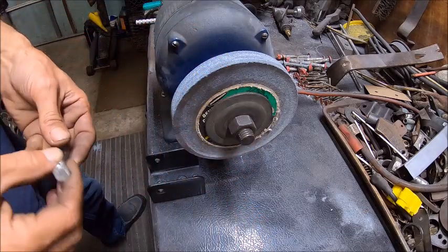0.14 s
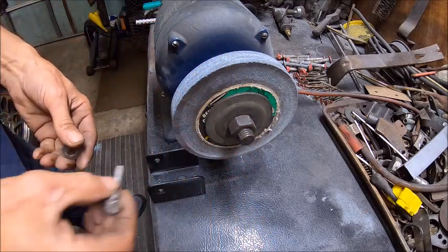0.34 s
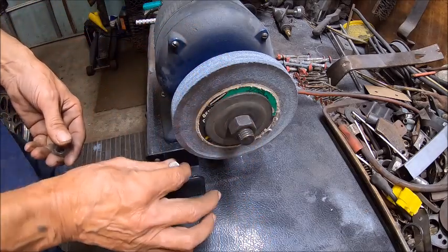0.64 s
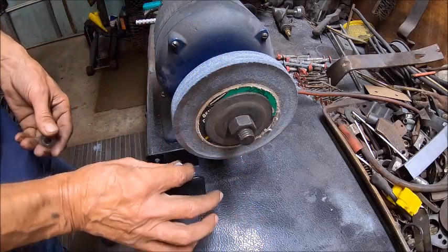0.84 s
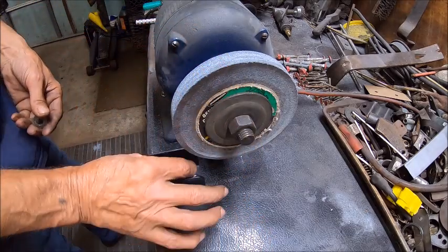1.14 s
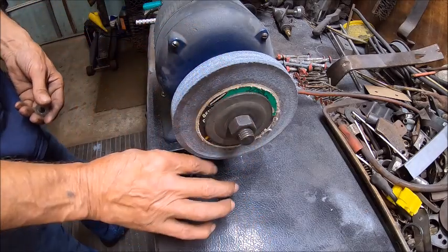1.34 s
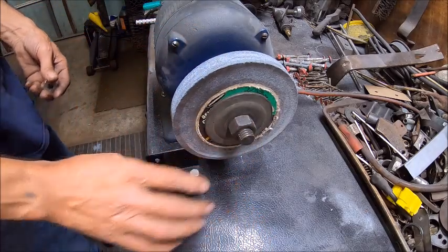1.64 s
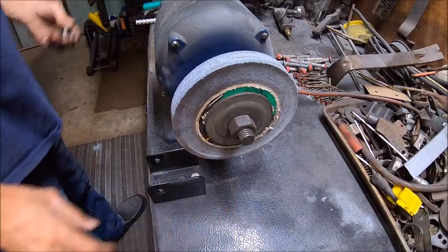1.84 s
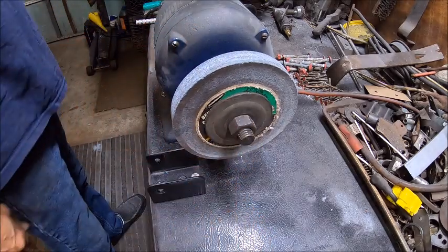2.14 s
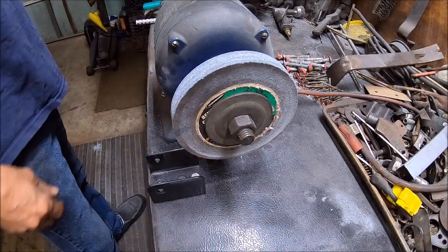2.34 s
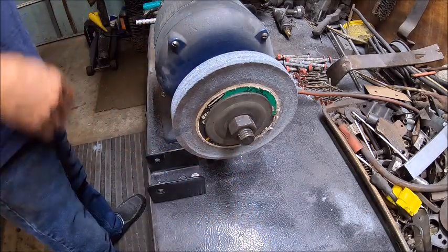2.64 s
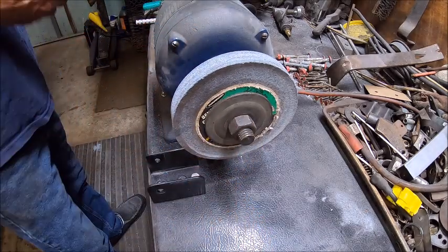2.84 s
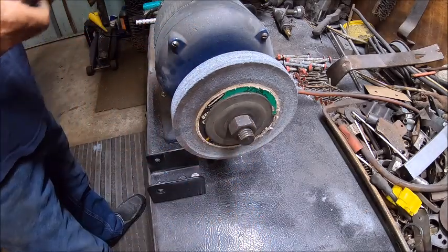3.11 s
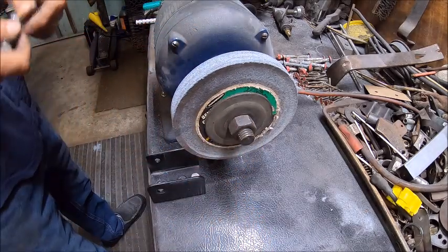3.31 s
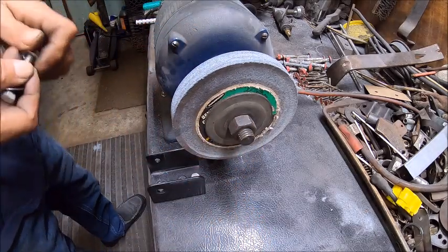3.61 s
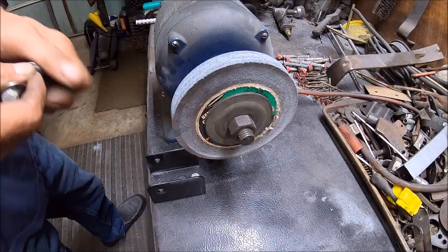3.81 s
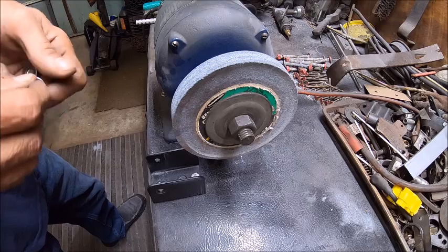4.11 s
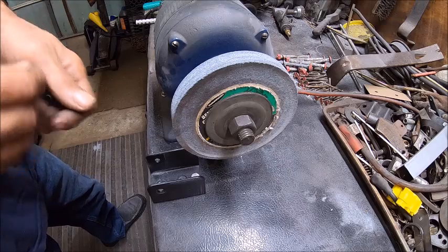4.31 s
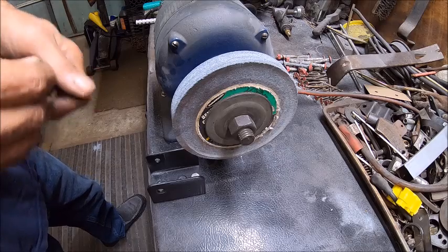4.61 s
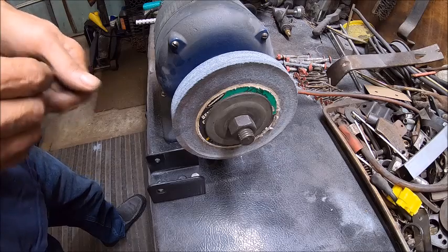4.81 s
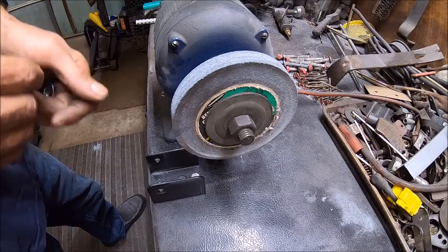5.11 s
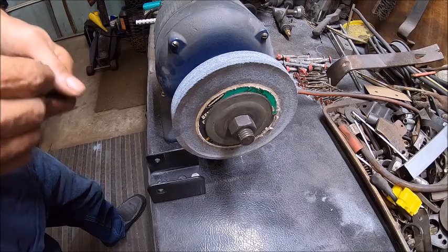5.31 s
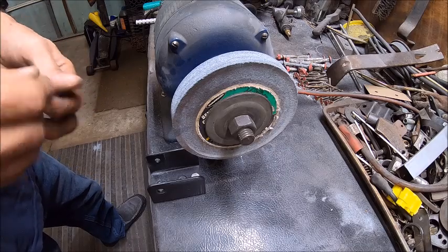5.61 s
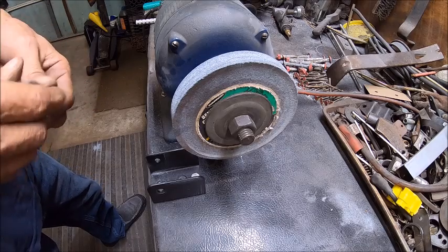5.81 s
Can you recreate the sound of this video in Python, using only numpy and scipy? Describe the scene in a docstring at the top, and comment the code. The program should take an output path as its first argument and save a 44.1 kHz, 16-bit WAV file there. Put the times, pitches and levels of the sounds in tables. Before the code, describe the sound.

Small steel parts click and rattle in the fingers, a screw rings and knocks on a metal bracket, then nuts tinkle and rasp faintly.

```python
"""A faint ventilation hum runs throughout. Hard clicks of small steel parts open the scene and return later.
A screw is set onto a steel bracket, which rings, knocks and is pushed over the bench top, so the bench sways.
After the bracket a small nut tinkles now and then, loose washers jingle, a nut rasps along a thread in
short twists and cloth brushes. Struck steel is a sum of decaying sine modes; knocks add bursts of coloured
noise, sliding contacts are trains of tiny stick-slip clicks, and decaying noise responses supply the room."""
import sys
import numpy as np
from scipy import signal
from scipy.fft import rfft, irfft, next_fast_len
from scipy.io import wavfile

SR = 44100
rng = np.random.default_rng(int(sys.argv[2]) if len(sys.argv) > 2 else 0)


def dump_mix(stems):
    """Bounce the given channels to the path in sys.argv[1] as a 16-bit WAV at rate SR."""
    frames = np.atleast_2d(stems).T  # one column per channel
    limited = np.clip(frames, -1, 1)  # hard clip at full scale
    pcm = np.round(limited * 32767).astype(np.int16)
    wavfile.write(sys.argv[1], SR, pcm)


N = 262395

# Levels in the tables are relative; each source sets its own gain.
# Air noise of the ventilation: (frequency [Hz], level [dB])
AIR_SPECTRUM = [(20, -22.5), (90, -29), (150, -12), (400, -25), (900, -23.5), (4500, -41.5), (7700, -37),
                (9000, -44.5), (16000, -62.5)]
# Duct resonances: (frequency [Hz], width [Hz], level [dB])
DUCT_RESONANCES = [(173, 65, -75), (214.9, 13, -71.5), (753, 67, -77)]
# Single hard clicks of steel parts held in the fingers: (time [s], level [dB])
CLICK_EVENTS = [(.165, -28.5), (.2057, -32), (.257, -42), (3.094, -45), (3.1105, -25.5), (3.114, -28),
                (3.234, -43.5), (3.46, -49), (3.49, -45), (4.171, -46.5), (4.557, -38.5), (4.996, -41),
                (5.241, -43.5), (5.324, -46), (5.378, -44), (5.3945, -34.5), (5.898, -47.5)]
# Modes of a gripped screw: (frequency [Hz], level [dB], 60 dB decay time [s])
SCREW_MODES = [(2380, -11, 0.0041), (4570, 2.5, 0.002), (5800, -5, 0.008), (6570, -13, 0.065),
               (7610, -3, 0.0071), (9350, -9.5, 0.013), (10370, -16.5, 0.023), (14000, -11.5, 0.0025)]
# The screw touches the bracket:
# (time [s], low-mode level [dB], high-mode level [dB], frequency favoured by this spot [Hz])
TOUCH_EVENTS = [(1.146, -50, -46.5, 5023), (1.214, -41, -39.5, 6142), (1.236, -31.5, -33, 7539),
                (1.3125, -39, -45, 7844), (1.461, -53.5, -60, 1500), (1.529, -36.5, -39.5, 7090),
                (1.565, -30, -38.5, 7844), (1.638, -47, -50.5, 7090), (1.673, -55, -52, 7539),
                (1.713, -68, -56, 7090), (1.743, -61, -52, 5023), (1.798, -54.5, -56.5, 6142),
                (1.869, -56.5, -66, 5023), (1.956, -61.5, -51.5, 10625)]
# Modes of the freely ringing bracket: (frequency [Hz], level [dB], 60 dB decay time [s])
BRACKET_MODES = [(1500, -8, .16), (1575, -8, .16), (2310, -12, .12), (3708, -10.5, .36), (4012, -6.5, .25),
                 (4257, -2, .21), (5023, 0, .19), (6142, -10, .17), (6800, -15, .17), (7090, -3, .14),
                 (7539, -2, .12), (7844, -5, .15), (8460, -15, .17), (8965, -13, .13), (10040, -21, .15),
                 (10625, -15, .1), (11200, -23, .18), (13380, -28, .14)]
# The bracket rocks and knocks on the bench: (time [s], body level [dB], hard edge against body [dB])
KNOCK_EVENTS = [(1.245, -22, -3.5), (1.313, -36, 0), (1.511, -43, 7), (1.529, -28, -25), (1.594, -33.5, 0),
                (1.611, -23.5, -29), (1.624, -26.5, 7.5), (1.676, -27, -16), (1.686, -21.5, -8.5),
                (1.793, -34.5, -2), (1.824, -37, -23), (1.861, -35.5, -10), (1.883, -31, -23),
                (1.914, -32, -16), (1.93, -25.5, -34), (1.963, -33.5, -10.5)]
# Modes of the bench top loaded by the bracket: (frequency [Hz], level [dB], 60 dB decay time [s])
BENCH_MODES = [(396.4, -7.5, 0.15), (579, -15.5, 0.12), (680, 0, 0.055), (851.4, 0, 0.065),
               (1051, -4.5, 0.051), (1205, -5, 0.091), (1523, -10, 0.16)]
# The bench's crowded weaker modes: (frequency [Hz], level [dB])
CROWDED_SPECTRUM = [(110, -10), (230, -5), (360, 2), (540, -7.5), (800, 1), (1250, -8), (2300, -19),
                    (5000, -57)]
# Hard steel contact: (frequency [Hz], level [dB])
EDGE_SPECTRUM = [(1000, -5.5), (1550, 1), (2350, 2.5), (3200, -1.5), (5500, -10.5), (8000, -19),
                 (13000, -48.5)]
# The weight of the hand jolts the bench: (time [s], sway level [dB])
JOLT_EVENTS = [(1.244, -41.5), (1.315, -37.5), (1.526, -33), (1.684, -35.5), (1.954, -38)]
# The hand pushes the bracket along: (start [s], end [s], level [dB])
PUSH_STROKES = [(1.257, 1.543, -59), (1.57, 1.969, -46.5)]
# A small nut tinkles: (time [s], level [dB])
NUT_EVENTS = [(2.2338, -46), (4.0576, -39), (5.6455, -36), (5.7195, -41.5), (5.7365, -36), (5.8161, -56.5)]
# Modes of the nut: (frequency [Hz], level [dB], 60 dB decay time [s])
NUT_MODES = [(10140, 8.5, 0.047), (10240, -0.5, 0.061), (13920, -14, 0.081)]
# Loose washers jingle: (time [s], level [dB])
WASHER_EVENTS = [(2.6155, -54.5), (2.6803, -51), (2.7846, -52.5), (2.92, -59.5), (2.9607, -56)]
# Modes of the washers: (frequency [Hz], level [dB], 60 dB decay time [s])
WASHER_MODES = [(6800, 6, 0.084), (6950, 13.5, 0.018), (9040, -7.5, 0.32), (9310, -10, 0.25)]
# Twists of the nut on the thread: (peak time [s], level [dB], half length [s], strongest frequency [Hz])
TWIST_EVENTS = [(3.105, -45.5, 0.0057, 8100), (3.301, -63, 0.038, 5800), (3.697, -52.5, 0.0035, 4640),
                (3.839, -69.5, 0.089, 8250), (3.949, -53.5, 0.023, 6000), (4.121, -49, .016, 4700),
                (4.311, -58, 0.0061, 5350), (4.424, -54, 0.025, 3400), (4.559, -45.5, 0.0084, 5000),
                (4.764, -60.5, 0.044, 6400), (4.962, -55.5, 0.028, 4770), (5.117, -55.5, 0.0058, 5200),
                (5.181, -65.5, 0.037, 9000), (5.343, -52, 0.021, 4730), (5.398, -41.5, 0.0066, 6500)]
# Rasp of the thread flanks: (frequency [Hz], level [dB])
THREAD_SPECTRUM = [(1300, -1), (1750, -9.5), (2250, 8), (3400, -4.5), (5600, 5), (8300, -4), (11000, -17.5),
                   (16000, -52)]
# Work clothes, and the soft thud on the palm: (frequency [Hz], level [dB])
CLOTH_SPECTRUM = [(250, -6), (500, -1.5), (1600, -4), (3000, -24)]

AIR_DB = -72
ROOM_T60_S, CUTOFF_HZ = .21, 15700
# the screw slips and rattles: each bounce comes sooner and a little weaker
RATTLE_S, RATTLE_DB = .2642, -20
BOUNCE_GAP_S, BOUNCE_SHRINK, BOUNCE_LOSS_DB = .0073, .88, .5
# brightness in dB per octave: the loose screw strikes duller than the light clicks
RATTLE_TILT_DB, CLICK_TILT_DB = -2, -1
# until PLACED_S the fingers shorten the ring of the bracket modes above 5 kHz to this share
PLACED_S, HELD_SHARE = 1.5, .65
HIGH_MODES_HZ, MUTE_DB_PER_S = 5500, 480
# every touch also passes into the bench: body against ring, hard edge against body
TOUCH_THUMP_DB, TOUCH_HARDNESS_DB = -1.5, 2.5
PUSH_RISE_DB_PER_S, PUSH_FALL_DB_PER_S = 136, 276
SWAY_RISE_S, SWAY_T60_S = .0099, .84
# the screw jiggles under a push: rate, level against the push, tilt in dB per octave
CHATTER_PER_S, CHATTER_DB, CHATTER_TILT_DB = 53, -15.5, 2


def amp(db):
    """Amplitude ratio: twenty decibels are a factor of ten."""
    return 10 ** (np.asarray(db) / 20)


def decay(t, t60):
    """Exponential decay: the level falls by 60 dB in t60 seconds."""
    return np.exp(-np.log(1000) * t / t60)


def rms_one(x):
    """Normalisation: scale a signal to unit power."""
    return x / np.sqrt(np.mean(x ** 2) + 1e-20)


def cut(x, hz, kind, order=2):
    """Butterworth filtering: a smooth high- or low-pass."""
    sos = signal.butter(order, min(hz, .45 * SR), kind, fs=SR, output="sos")
    return signal.sosfilt(sos, x + 1e-18)


def coloured(x, spectrum):
    """Spectral shaping: weight each frequency by a (Hz, dB) curve, then scale to unit power."""
    hz, db = np.transpose(spectrum)
    size = next_fast_len(x.shape[-1])
    bins = np.arange(size // 2 + 1) * SR / size
    gain = amp(np.interp(np.log(bins + 1), np.log(hz), db, left=-200, right=-200))
    shaped = irfft(rfft(x, size) * gain, size)
    return rms_one(shaped[..., :x.shape[-1]])


def resonant_noise(hz, width_hz):
    """Resonance: two unrelated noises each pass the same peak filter twice."""
    b, a = signal.iirpeak(hz, hz / width_hz, fs=SR)
    once = signal.lfilter(b, a, rng.standard_normal((2, N)))
    return rms_one(signal.lfilter(b, a, once))


def widen(pair, side_db):
    """Stereo width: two unrelated signals serve as mid and side."""
    return pair[0] + amp(side_db) * pair[1] * np.array([[1], [-1]])


def from_left(x, pan_db):
    """Interaural delay: sound from the left reaches the right channel a quarter of a millisecond later."""
    lag = 11  # samples
    right = np.pad(x, (lag, 0))[:len(x)]
    return np.array([x * amp(pan_db / 2), right * amp(-pan_db / 2)])


def add(out, s, sound):
    """Superposition: mix a sound in at a time in seconds."""
    at = int(s * SR)
    out[..., at:at + sound.shape[-1]] += sound[..., :out.shape[-1] - at]


def flutter(size):
    """Slow modulation: a smooth random wobble below about 60 Hz, of spread 1."""
    return rms_one(cut(rng.standard_normal(size), 60, "low"))


def ring(modes, gains_db, vary_db, detune):
    """Modal synthesis: one blow excites every mode with its own random strength, and each dies away."""
    hz, db, t60 = np.transpose(modes)[:, :, None]
    t = np.arange(int(t60.max() * SR)) / SR
    strength, shift, side = rng.standard_normal((3, len(modes), 1))
    height = amp(db + np.reshape(gains_db, (-1, 1)) + vary_db * strength) * np.sign(side)
    tones = np.sin(2 * np.pi * hz * (1 + detune * shift) * t)
    return np.sum(height * decay(t, t60) * tones, axis=0)


def burst(spectrum, t60, side_db):
    """High modal density: crowded modes merge into coloured noise with a swift onset and a decay."""
    t = np.arange(SR // 4) / SR
    envelope = np.clip(t / .00037, 0, 1) * decay(t, t60)
    noise = coloured(rng.standard_normal((2, len(t))), spectrum)
    return widen(noise, side_db) * envelope


def skip(sound, gap_s, loss_db, count):
    """Repeated impact: steel lands a few times at uneven gaps, weaker each time."""
    out = np.zeros(len(sound))
    times = np.cumsum(gap_s * rng.uniform(.5, 1.5, count))
    for k, s in enumerate(times - times[0]):
        add(out, s, amp(-loss_db * k) * sound)
    return out


def slips(per_s, spread_db):
    """Stick-slip friction: two random trains of tiny clicks of uneven size and sign."""
    sizes_db = spread_db * np.minimum(rng.exponential(1, (2, N)), 4)
    sizes = amp(sizes_db) * rng.choice([-1, 1], (2, N))
    return sizes * (rng.random((2, N)) < per_s / SR)


def stroke(start, end, db, rise_db_per_s, fall_db_per_s):
    """Gesture envelope: one hand movement swells, holds and releases at steady rates in decibels."""
    t = np.arange(N) / SR
    before, after = np.maximum(start - t, 0), np.maximum(t - end, 0)
    return amp(db - rise_db_per_s * before - fall_db_per_s * after)


def workshop(x, early_db, tail_db):
    """Reverberation: scatter off the bench and the grinder, then a short diffuse tail."""
    t = np.arange(SR // 2) / SR
    near, far = rng.standard_normal((2, 2, len(t)))
    early = near * (t > .003) * np.exp(-t / .0086)
    tail = cut(far, 8300, "low") * np.clip(t / .0022, 0, 1) * decay(t, ROOM_T60_S)
    response = (amp(early_db) * rms_one(early) + amp(tail_db) * rms_one(tail)) / np.sqrt(len(t))
    return x + signal.fftconvolve(x, response, axes=1)[:, :N]


def ventilation():
    """Flow noise: steady broadband air with a few duct resonances."""
    air = amp(AIR_DB) * widen(coloured(rng.standard_normal((2, N)), AIR_SPECTRUM), side_db=1.5)
    hum = sum(amp(db) * widen(resonant_noise(hz, width), side_db=-9) for hz, width, db in DUCT_RESONANCES)
    return air + hum


def rattle(count):
    """Bouncing: gaps shrink geometrically and each bounce loses level; gives (time [s], level [dB])."""
    gaps = BOUNCE_GAP_S * BOUNCE_SHRINK ** np.arange(count)
    return [(RATTLE_S + gaps[:k].sum(), RATTLE_DB - BOUNCE_LOSS_DB * k) for k in range(count)]


def clicks():
    """Contact damping: fingers still the screw at once, and the grip shifts its modes at each click."""
    out = np.zeros((2, N))
    octaves = np.log2(np.array(SCREW_MODES)[:, 0] / 5000)
    for blows, tilt_db in (CLICK_EVENTS, CLICK_TILT_DB), (rattle(count=5), RATTLE_TILT_DB):
        for s, db in blows:
            pair = []
            for _ in range(2):
                tone = ring(SCREW_MODES, tilt_db * octaves, vary_db=2, detune=.025)
                click = skip(tone, gap_s=.00045, loss_db=4, count=2)
                pair.append(click / np.linalg.norm(click))  # unit energy
            add(out, s, amp(db + 12.5) * widen(pair, side_db=-2))
    return cut(cut(out, 1800, "high", order=4), 11000, "low", order=3)


def bracket():
    """Selective excitation: the landing spot favours one mode; shifting fingers make each ring waver."""
    out, hz = np.zeros(N), np.array(BRACKET_MODES)[:, 0]
    for s, low_db, high_db, favoured_hz in TOUCH_EVENTS:
        modes = np.array(BRACKET_MODES)
        gains_db = np.where(hz > HIGH_MODES_HZ, high_db, low_db)
        nearest_hz = hz[np.argmin(np.abs(hz - favoured_hz))]
        gains_db = gains_db + 9 * (hz == nearest_hz)
        if s < PLACED_S:
            modes[hz > 5000, 2] *= HELD_SHARE
        tone = ring(modes, gains_db, vary_db=.5, detune=.0005)
        add(out, s, tone * amp(2.5 * flutter(len(tone))))
    # the fingers still the ring as the last push ends
    held_s = np.maximum(np.arange(N) / SR - PUSH_STROKES[-1][1], 0)
    muted = cut(out, 12500, "low", order=4) * amp(-MUTE_DB_PER_S * held_s)
    return muted * amp([[-1], [1]])  # 2 dB stronger on the right


def bench_blows():
    """Transmission: knocks and touches both drive the bench; columns as in KNOCK_EVENTS."""
    touches = [(s, db + TOUCH_THUMP_DB, TOUCH_HARDNESS_DB) for s, db, _, _ in TOUCH_EVENTS]
    return KNOCK_EVENTS + touches


def pushing():
    """Driving force: how hard the bracket is pushed, as a gain over time."""
    return sum(stroke(*push, PUSH_RISE_DB_PER_S, PUSH_FALL_DB_PER_S) for push in PUSH_STROKES)


def bench():
    """Impact and friction: the top answers with a dull clank, a hard edge adds a clack, pushing drags."""
    clanks, clacks = np.zeros((2, N)), np.zeros((2, N))
    for s, body_db, hard_db in bench_blows():
        pair = [ring(BENCH_MODES, body_db - 6, vary_db=3, detune=.012) for _ in range(2)]
        clank = widen(pair, side_db=-8.5)
        soft_onset = np.minimum(np.arange(clank.shape[1]) / SR / .002, 1)
        add(clanks, s, clank * soft_onset)
        add(clacks, s, amp(body_db - 5.5) * burst(CROWDED_SPECTRUM, t60=.045, side_db=-12.5))
        add(clacks, s, amp(body_db + hard_db - 8) * burst(EDGE_SPECTRUM, t60=.048, side_db=-4))
    drag = widen(coloured(slips(per_s=350, spread_db=2), CROWDED_SPECTRUM), side_db=-8.5)
    mixed = clacks + cut(clanks, 3100, "low") + pushing() * drag
    return mixed * amp([[-1], [1]])  # 2 dB stronger on the right


def shake():
    """Transient response: each jolt sways the heavy bench at low modes, rocking the channels in opposition."""
    energy = 0
    for s, sway_db in JOLT_EVENTS:
        age = np.maximum(np.arange(N) / SR - s, 0)
        swell = amp(sway_db) * (1 - np.exp(-age / SWAY_RISE_S)) * decay(age, SWAY_T60_S)
        energy = energy + swell ** 2
    sway = signal.hilbert(resonant_noise(60, 38)[0])
    steady = sway.real / (np.abs(sway) + .1)  # evens out the noise envelope
    rocking = 3.2 * steady * np.array([[-.9], [1.1]])
    rumble = rocking + amp(-6) * resonant_noise(62, 21)[0]
    upper = amp(-8) * resonant_noise(91, 120)
    return cut(cut(np.sqrt(energy) * (rumble + upper), 38, "high", order=3), 180, "low")


def chatter():
    """Intermittent contact: while the bracket moves, the screw jiggles on it in light, bright contacts."""
    out, effort = np.zeros(N), pushing()
    octaves = np.log2(np.array(BRACKET_MODES)[:, 0] / 5000)
    colour_db = CHATTER_DB + CHATTER_TILT_DB * octaves
    for beat in np.arange(PUSH_STROKES[0][0], PUSH_STROKES[-1][1], 1 / CHATTER_PER_S):
        s = beat + rng.random() / CHATTER_PER_S
        add(out, s, effort[int(s * SR)] * ring(BRACKET_MODES, colour_db, vary_db=3, detune=.002))
    return from_left(cut(out, 12500, "low", order=4), pan_db=-1.5)


def tinkle(taps, modes, gain_db, tick_db, pan_db):
    """Free vibration: a loose small part skips lightly on landing and rings undamped by the hand."""
    out = np.zeros(N)
    for s, db in taps:
        tone = ring(modes, db + gain_db, vary_db=2, detune=.003)
        onset = np.clip(np.arange(len(tone)) / SR / .00019, 0, 1)
        add(out, s, tone * onset * amp(4.2 * flutter(len(tone))))
        tick = ring(SCREW_MODES, db + tick_db, vary_db=2, detune=.05)
        add(out, s, skip(tick, gap_s=.002, loss_db=2, count=4))
    return from_left(cut(out, 3700, "high"), pan_db)


def thread_colour(peak_hz):
    """Contact resonance: the thread's spectrum, strongest at one pitch and uneven by chance."""
    hz = np.geomspace(THREAD_SPECTRUM[0][0], THREAD_SPECTRUM[-1][0], num=40)
    focus_db = -7 * np.abs(np.log2(hz / peak_hz))  # falls 7 dB per octave either side
    shape = np.interp(hz, *np.transpose(THREAD_SPECTRUM)) + focus_db
    return np.column_stack([hz, shape + 5 * rng.standard_normal(len(hz))])


def thread():
    """Stick-slip: flanks rasp in tiny slips, at two contacts of their own colour in each twist."""
    out = np.zeros((2, N))
    t = np.arange(SR // 2) / SR - .2  # seconds from the peak of a twist
    grains = slips(per_s=1300, spread_db=3)
    for s, db, half, peak_hz in TWIST_EVENTS:
        at = int((s + t[0]) * SR)
        swell = 1 / np.cosh(t / half)
        # the room lets the twist fade
        tail = (t > 0) * (1 - swell) * decay(np.abs(t), ROOM_T60_S)
        fade = amp(-9) * swell + amp(-11) * tail
        for contact in grains[:, at:at + len(t)]:
            spectrum = thread_colour(peak_hz)
            uneven = swell * amp(3.5 * flutter(len(t)))
            rasp = from_left(uneven * coloured(contact, spectrum), pan_db=4)
            diffuse = fade * coloured(rng.standard_normal((2, len(t))), spectrum)
            add(out, s + t[0], amp(db) * (rasp + diffuse))
    return out


def palm():
    """Soft impact: parts drop against the palm with a dull thud under their click."""
    out = np.zeros((2, N))
    add(out, 3.1105, amp(-57.5) * burst(CLOTH_SPECTRUM, t60=.059, side_db=-4))
    return out


def sleeve():
    """Fibre friction: work clothes brush softly as the hands come back up."""
    brush = widen(coloured(rng.standard_normal((2, N)), CLOTH_SPECTRUM), side_db=1.5)
    return stroke(3.77, 4.075, -72, rise_db_per_s=45, fall_db_per_s=48) * brush


def scene():
    """Superposition: the hands, the bracket on the bench and the room add linearly."""
    nut = tinkle(NUT_EVENTS, NUT_MODES, gain_db=1, tick_db=-6.5, pan_db=-1)
    washers = tinkle(WASHER_EVENTS, WASHER_MODES, gain_db=-7, tick_db=-1.5, pan_db=.5)
    hands = workshop(clicks() + palm() + nut + washers, early_db=-4.5, tail_db=-11)
    ringing = workshop(bracket() + chatter(), early_db=-9, tail_db=-13)
    knocking = workshop(bench(), early_db=-9.5, tail_db=-9)
    return ventilation() + hands + ringing + knocking + shake() + thread() + sleeve()


def record(dry):
    """Band limiting: a steep elliptic low-pass removes the extreme treble."""
    sos = signal.ellip(10, .2, 80, CUTOFF_HZ, fs=SR, output="sos")
    return signal.sosfilt(sos, dry)


dry = scene()
out = record(dry)
dump_mix(out)
```